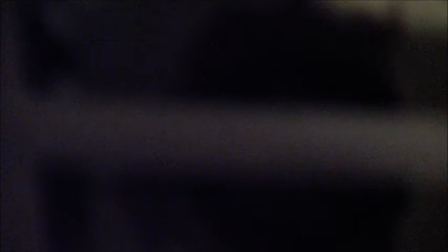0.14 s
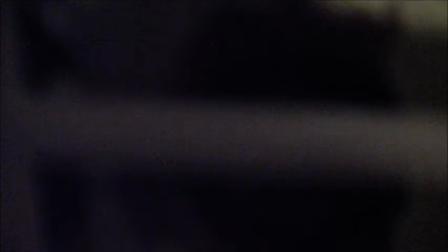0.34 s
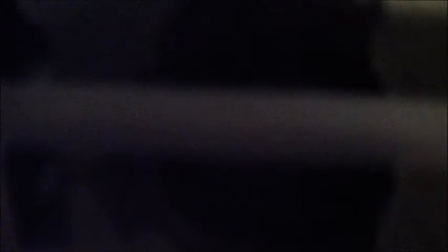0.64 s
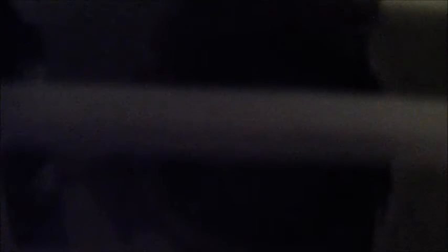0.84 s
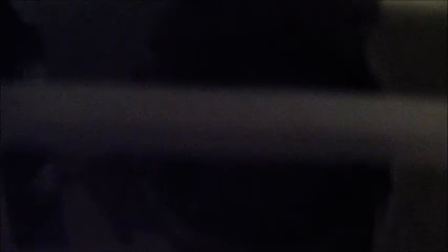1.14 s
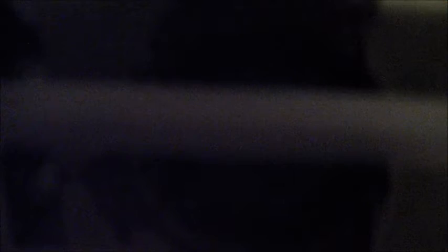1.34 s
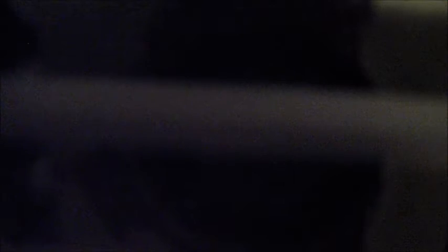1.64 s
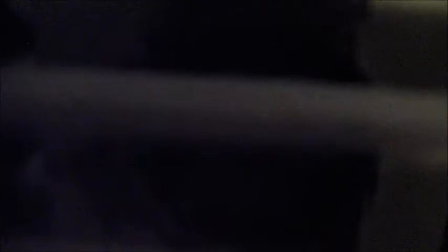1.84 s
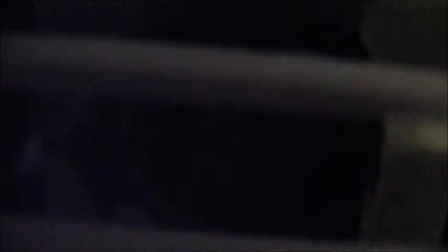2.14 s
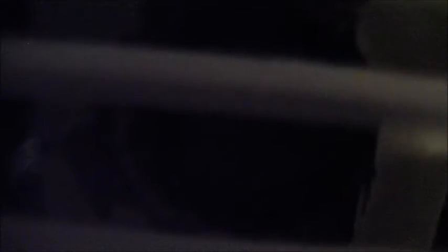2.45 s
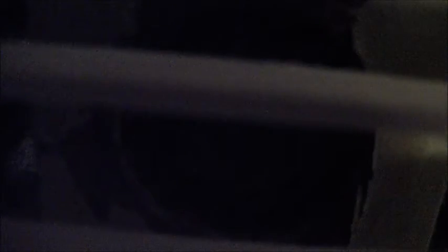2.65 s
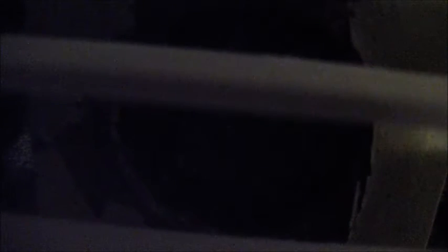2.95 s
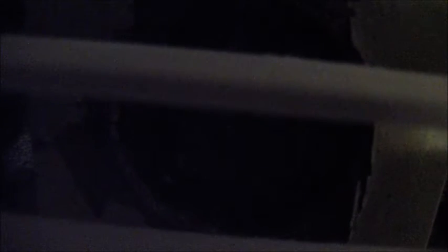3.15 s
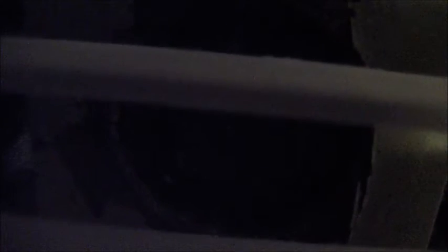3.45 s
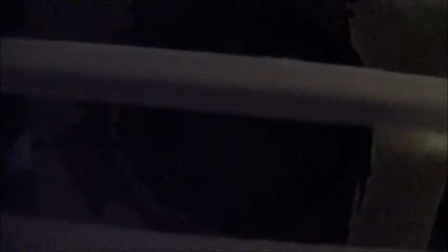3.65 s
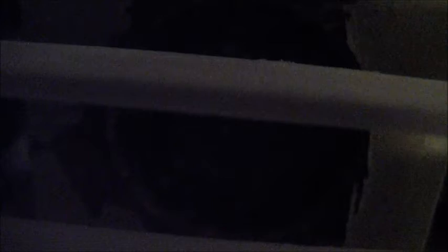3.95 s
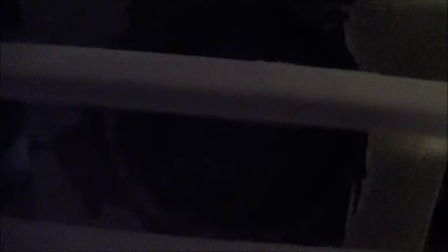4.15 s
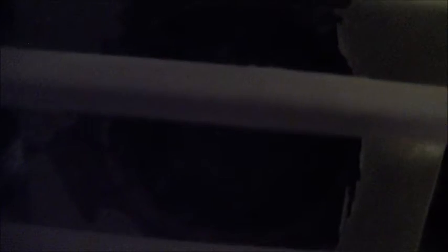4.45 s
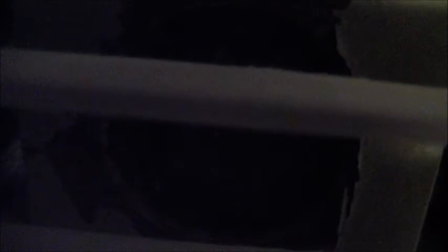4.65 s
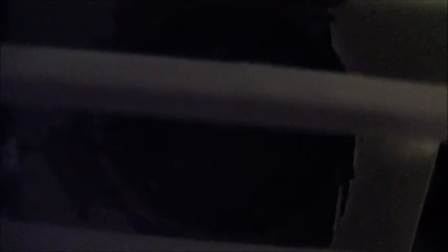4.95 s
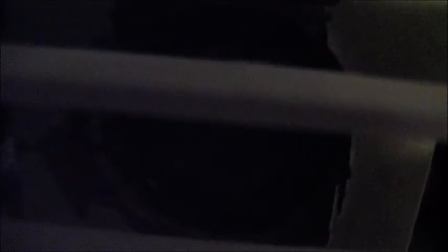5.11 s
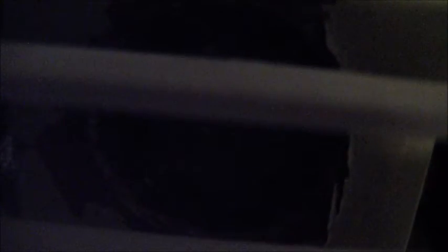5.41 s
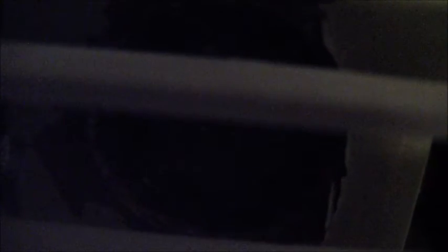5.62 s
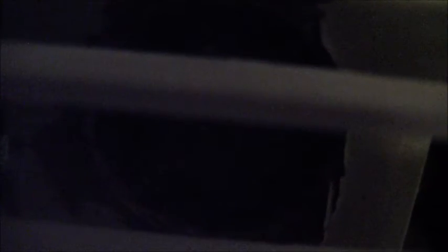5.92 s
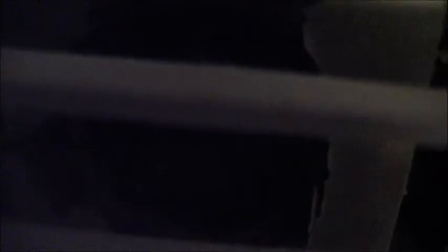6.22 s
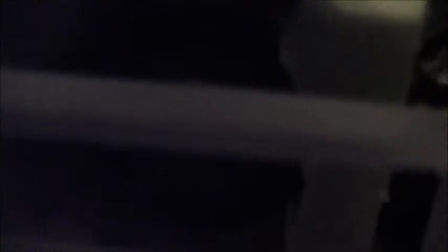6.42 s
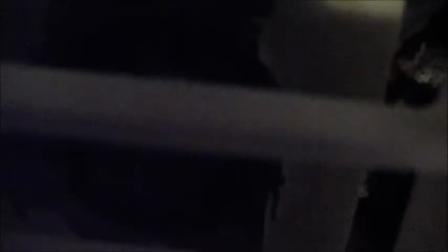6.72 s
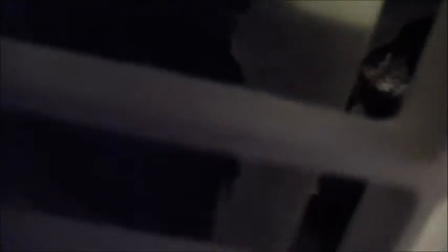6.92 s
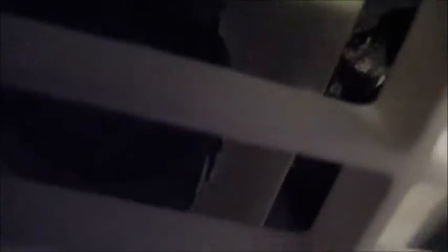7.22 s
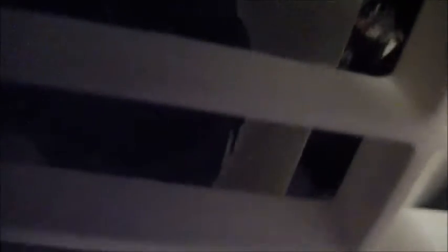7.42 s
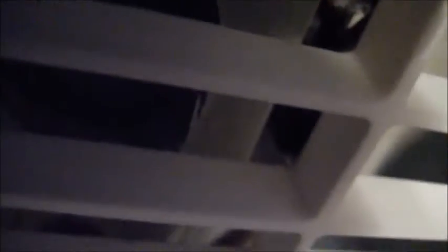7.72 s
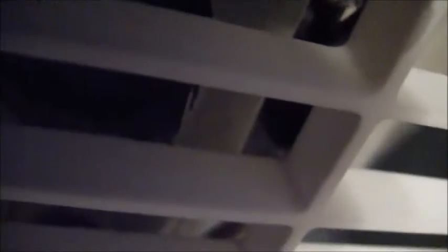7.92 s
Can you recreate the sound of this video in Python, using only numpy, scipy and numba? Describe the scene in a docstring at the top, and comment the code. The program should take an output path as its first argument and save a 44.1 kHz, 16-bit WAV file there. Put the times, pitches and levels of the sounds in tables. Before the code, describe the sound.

A small electric fan speeds up right at the microphone, humming and rushing, with a sharp plastic switch snap early on and fast light ticking.

```python
"""A small mains fan speeds up right in front of a two-port microphone for 8 s. From the start: summed motor hum
and blade tone, shaped noise for air rush and for draught on the ports, and short noise bursts for shaft ticks.
At 0.44 s a faint hiss swells, then a speed switch snaps (noise bursts, decaying sines, a jolt); the gain control
ducks under it. Then the pitch climbs on ever more slowly, the rush dips and surges, and the shaft ticks weaken,
mostly late. Stray ticks and fuller snaps, also noise bursts, are scattered throughout."""
import sys
import numpy as np
from scipy import signal
from scipy.fft import rfft, irfft, next_fast_len
from scipy.io import wavfile
from scipy.ndimage import uniform_filter1d, map_coordinates
from numba import njit

SR = 44100
rng = np.random.default_rng(int(sys.argv[2]) if len(sys.argv) > 2 else 0)


def master(y):
    """Save y as 16-bit WAV."""
    cut = np.clip(np.atleast_2d(y).T, -1, 1)
    pcm = np.round(cut * 32767)  # scale
    wavfile.write(sys.argv[1], SR, pcm.astype(np.int16))


N = 355842

# Draught on the ports: time_s, level_db
DRAUGHT_LEVEL = [(0, -38), (1.2, -22.5), (6, -21), (6.8, -23), (8.07, -30.5)]
# Draught spectrum: freq_hz, relative_db_per_hz
DRAUGHT_SPECTRUM = [(8.8, -15), (15, -1.5), (43, 5.5), (119, 0.5), (245, -10), (900, -45), (1170, -73),
                    (1980, -120)]

# Motor hum before the nearness gain: freq_hz, rms_db
HUM_PARTIALS = [(120, -39), (240, -44), (360, -50), (480, -51.5), (600, -47)]
# Hum gain as the ports near the motor: time_s, gain_db
HUM_NEARNESS = [(0, 3.5), (6.8, -2), (7.1, 0.5), (8.07, 4.5)]

# Shaft speed: time_s, speed_turns_per_s
SHAFT_SPEED = [(0, 12.216), (.6, 13.414), (1.5, 15.134), (2.5, 16.403), (3.5, 17.251), (4.5, 17.889),
               (5.5, 18.226), (6.5, 18.451), (8.07, 18.664)]
# Ticks out of step with the shaft, before the band filter: start_s, level_db
STRAY_TICKS = [(.0726, -17), (.851, -27), (.9937, -28), (1.5843, -19), (4.4214, -23), (5.1795, -16),
               (5.8394, -18), (6.273, -19), (7.0288, -21), (7.3479, -26), (7.8106, -23.5)]
# Fuller ticks and snaps, some on a shaft turn, before the band filter:
# start_s, level_db, t60_s, low_edge_hz, high_edge_hz
FULLER_SNAPS = [(.3605, -23, 0.0034, 3000, 20000), (.508, -20, .006, 1500, 5000),
                (2.262, -36, 0.28, 5500, 11000), (3.094, -26, .005, 3000, 12000),
                (7.6306, -6, 0.015, 1300, 2600), (8.03, -16, 0.02, 5000, 5000)]
TICK_PHASE_TURNS, TICK_JITTER_S = .485, .0015
TICK_DB, TICK_FADE_DB, TICK_SCATTER_DB = -22.5, 13, 2  # at the first speed; loss at full speed; spread

# Ring of the switch plastic before SWITCH_GAIN_DB: freq_hz, level_db, t60_s, left_lead_rad
PLASTIC_MODES = [(420, -11, 0.03, .3), (1005, -10, 0.018, .3), (1180, -14, .014, .3), (1400, -14, .01, .5),
                 (2120, 1, 0.006, .8), (3050, -9, .006, 1.6), (3570, -2, .006, 2.8), (4200, -5, 0.006, 1.2),
                 (4600, -7, .005, 2.6), (5350, -4, 0.007, .7), (6450, 1, 0.005, .1), (7700, -6, .004, .2),
                 (8500, -1, 0.004, .3), (10300, -5, .003, .8), (14000, -5, .003, .8)]
SWITCH_S, SWITCH_GAIN_DB = .4443, -3.5
HISS_RISE_S, HISS_RISE_DB = 0.032, -30  # level before SWITCH_GAIN_DB
JOLT_DB, JOLT_DECAY_S, JOLT_RIGHT_SHARE = -4, .014, -.6  # level before onset and SWITCH_GAIN_DB

# Blade tone before the eddy wobble: time_s, fundamental_db, octave_db
BLADE_TONE = [(0, -26, -35), (2, -25.5, -35.5), (4, -24.5, -39), (6, -27, -37), (6.8, -32.5, -39),
              (7.1, -25, -32.5), (8.07, -24, -32.5)]
BLADE_COUNT = 7

# Air rush before dips, surges and flutter: time_s, level_db
AIR_LEVEL = [(0, -40), (.4, -37.5), (.6, -37), (.9, -36.5), (1.5, -33.5), (2.3, -37), (3.3, -33),
             (4.3, -38), (5.2, -36.5), (6, -35.5), (6.6, -34.5), (7.2, -32), (8.07, -34)]
# The rush sinks briefly: start_s, depth_db
AIR_DIPS = [(1.01, 3), (1.15, 5), (1.23, 3), (1.59, 6.5), (1.65, 2), (1.84, 4), (2.1, 2.5), (2.42, 4),
            (2.52, 4), (2.73, 4), (2.88, 4), (2.94, 4), (3.079, 7.5), (3.33, 2.5), (3.59, 5.5), (3.75, 4.5),
            (3.9, 3.5), (4.09, 3.5), (4.16, 4), (4.22, 1.5), (4.41, 3), (5.2, 4.5), (5.43, 3.5),
            (6.07, 5.5), (6.33, 4.5), (6.61, 4), (6.702, 4), (6.801, 9.5), (6.84, 0), (7.22, 4),
            (7.41, 3.5), (7.7, 4)]
DIP_FALL_S, DIP_RECOVER_S = 0.027, 0.072
# The rush swells briefly: centre_s, rise_db, sigma_s
AIR_SURGES = [(.99, 2.5, .018), (1.1, 2.5, 0.029), (1.47, 1, 0.012), (2.05, 2, 0.016), (2.4, 3, 0.012),
              (3.03, 5, 0.03), (3.28, 1.5, 0.014), (3.58, 1, 0.016), (3.74, 3, 0.018), (4.07, 2, 0.015),
              (4.32, 4.5, 0.012), (4.39, 1, 0.013), (4.72, 3, 0.01), (5.1, 3.5, 0.017), (5.42, 2.5, 0.018),
              (5.538, 1.5, 0.0034), (5.74, 3, 0.012), (6.2, 2.5, 0.019), (6.47, 3, .015), (6.68, 5, 0.019),
              (7.15, 2, 0.02), (7.385, 3, 0.022), (7.99, 3.5, 0.013)]
# Over the air, as the ports drift along the grille, before flutter: time_s, low_air_db, fizz_db, hub_hiss_db
AIR_BALANCE = [(0, 14.5, -17.5, -19.5), (2, 11.5, -15.5, -22.5), (6.8, 11.5, -14.5, -24),
               (7.1, 11, -14, -23), (8.07, 12, -13.5, -21)]
# Low roar spectrum: freq_hz, relative_db_per_hz
LOW_SPECTRUM = [(35, -41), (60, -10.5), (121, 0), (156, -10), (243, -11.5), (404, -17), (486, -15.5),
                (800, -37.5), (1040, -58), (1760, -120)]
# Main air spectrum: freq_hz, relative_db_per_hz
BODY_SPECTRUM = [(320, -18.5), (550, -2.5), (799, -8.5), (1020, -4.5), (1480, -6), (1670, -13.5),
                 (1850, -15), (2580, -12.5), (2850, -11.5), (4000, -38.5), (5200, -72), (8800, -120)]
# Fizz spectrum: freq_hz, relative_db_per_hz
FIZZ_SPECTRUM = [(2060, -13.5), (3500, 0.5), (4470, -5), (5490, -6), (10500, -16), (13600, -39),
                 (22000, -120)]
# Hub hiss spectrum: freq_hz, relative_db_per_hz
HUB_SPECTRUM = [(5880, -9), (10000, -7), (10600, -10), (12000, -2), (13000, -5), (14300, -2.5), (15400, -7),
                (15900, -16), (16300, -22)]
# Left-right likeness of the air: freq_hz, correlation
AIR_LIKENESS = [(200, .95), (450, .96), (740, .982), (1220, .992), (1600, .98), (2010, .9), (3330, .87),
                (4800, .88), (6000, .7), (9080, .35), (15000, -.03)]

# Fan balance between the ports: freq_hz, left_over_right_db
FAN_LEAN = [(60, 5), (180, 1.5), (550, 1), (1650, 0), (4970, 0.5), (15000, 0)]
# Microphone cavities: centre_hz, width_hz, gain_db
PORT_CAVITIES = [(1663, 43, -6.5), (1847, 67, 7.5), (2597, 290, -6.5), (2820, 180, 0.5), (5370, 230, 2.5),
                 (5940, 220, 0.5), (6940, 1150, 0.5), (8100, 700, 1.5), (11700, 480, 1), (14000, 980, -2)]
DUCK_THRESHOLD_DB, DUCK_SLOPE = -7, .72  # slope: dB of ducking per dB of excess
DUCK_HOLD_S, DUCK_RELEASE_DB_PER_S, DUCK_ATTACK_S = .048, 200, .0068
CLIP_CEILING, TOP_HZ = .51, 15900  # full scale = 1


def amp(db):
    """Gain of a level."""
    return 10 ** (np.asarray(db) / 20)


def unit(x):
    """Scaled to rms 1."""
    return x / np.sqrt(np.mean(x ** 2) + 1e-20)


def along(points, hz):
    """(freq_hz, value) points interpolated on a log axis."""
    point_hz, value = np.transpose(points)
    return np.interp(np.log(hz + 1), np.log(point_hz + 1), value)


def curves(rows):
    """One value per sample for each column after the time."""
    time_s, *columns = np.transpose(rows)
    return [np.interp(np.arange(N) / SR, time_s, column) for column in columns]


def wobble(rate_hz):
    """Smooth random curve, rate_hz knots a second."""
    knots = rng.standard_normal(int(N * rate_hz / SR) + 4)
    return map_coordinates(knots, [np.arange(N) * rate_hz / SR])


def filtered(x, response):
    """x through a complex response of frequency."""
    size = next_fast_len(N + SR // 2)
    return irfft(rfft(x, size) * response(np.fft.rfftfreq(size, 1 / SR)), size)[..., :N]


def rush(spectrum, likeness, patchy_db):
    """Stereo noise of rms 1 with patches of random gain in time and frequency."""
    bins = signal.stft(rng.standard_normal((2, N)), nperseg=512)[2]
    patches = uniform_filter1d(rng.standard_normal(bins.shape[1:]), size=6, axis=0)
    patches = uniform_filter1d(patches, size=8, axis=1)
    pair = signal.istft(bins * amp(patchy_db * unit(patches)), nperseg=512)[1][:, :N]

    def mid_side(hz):
        angle = np.arccos(np.clip(along(likeness, hz), -1, 1)) / 2  # sets the port correlation
        return amp(along(spectrum, hz)) * [np.cos(angle), np.sin(angle)]

    mid, side = filtered(pair, mid_side)
    return unit(np.array([mid + side, mid - side]))


def snaps(rows, lo_hz, hi_hz, apart):
    """Dying noise bursts (start_s, level_db, t60_s) in a band; apart weights each port's own noise."""
    t = np.arange(SR // 10) / SR
    out = np.zeros((2, N + len(t)))
    for start_s, db, t60_s in rows:
        common = np.sign(rng.standard_normal(len(t)))
        own = rng.standard_normal((2, len(t)))
        envelope = amp(db - 60 * t / t60_s) * (1 - np.exp(-t / 0.00031))
        out[:, round(start_s * SR):][:, :len(t)] += envelope * (common + apart * own)

    def band(hz):
        highpass = (1j * hz / lo_hz / (1 + 1j * hz / lo_hz)) ** 4
        return highpass / (1 + 1j * hz / hi_hz) ** 2

    return filtered(out, band)


def shaft_turns():
    """Turns made so far: the running sum of shaft speed."""
    return np.cumsum(curves(SHAFT_SPEED)[0]) / SR


def flow_db():
    """Level of the air rush: dips sink quickly and recover slowly, surges come and go evenly."""
    t = np.arange(N) / SR
    level_db = curves(AIR_LEVEL)[0]
    for centre_s, rise_db, sigma_s in AIR_SURGES:
        level_db = level_db + rise_db * np.exp(-.5 * ((t - centre_s) / sigma_s) ** 2)
    for start_s, depth_db in AIR_DIPS:
        fall = np.clip((t - start_s) / DIP_FALL_S, 0, 1)
        recovery = np.exp(-np.clip(t - start_s - DIP_FALL_S, 0, None) / DIP_RECOVER_S)
        level_db = level_db - depth_db * fall * recovery
    return level_db


def draught():
    """Eddies buffet each port almost on their own, in lumps that swell where the air rush dips."""
    level_db, = curves(DRAUGHT_LEVEL)
    air_db = flow_db()
    lumps_db = 1.8 * np.array([wobble(14), wobble(12)]) - 0.24 * (air_db - air_db.mean())
    noise = rush(DRAUGHT_SPECTRUM, [(30, 0.078)], patchy_db=0.16)
    return amp(level_db) * unit(amp(lumps_db) * noise)


def fuller_snaps():
    """Fuller ticks and snaps, some on a shaft turn: one filtered noise burst each."""
    return sum(snaps([(start_s, db, t60_s)], lo_hz=lo_hz, hi_hz=hi_hz, apart=0.67)
               for start_s, db, t60_s, lo_hz, hi_hz in FULLER_SNAPS)


def ticks():
    """Something on the shaft brushes the frame once a turn, more lightly with speed; strays fall between."""
    turns, (speed,) = shaft_turns(), curves(SHAFT_SPEED)
    at = np.searchsorted(turns, np.arange(TICK_PHASE_TURNS, turns[-1] - 1))
    late, size = rng.standard_normal((len(at), 2)).T
    speed_up = (speed[at] - speed[0]) / np.ptp(speed)  # 0 to 1
    level_db = TICK_DB - TICK_FADE_DB * speed_up ** 6 + TICK_SCATTER_DB * size
    rows = [*zip(at / SR + TICK_JITTER_S * late, level_db), *STRAY_TICKS]
    return snaps([(s, db, .007) for s, db in rows], lo_hz=12000, hi_hz=16000, apart=0.66)


def switch():
    """A faint hiss swells just before the switch snaps: crack, rattle, rebound, plastic modes, a jolt."""
    t = np.arange(N) / SR - SWITCH_S
    after = np.clip(t, 0, .1)
    half = np.array([[.5], [-.5]])
    ring = sum(amp(db - 60 * after / t60_s) * np.sin(2 * np.pi * hz * after + lead_rad * half)
               for hz, db, t60_s, lead_rad in PLASTIC_MODES)
    push = np.exp(-after / JOLT_DECAY_S) * (1 - np.exp(-after / .002))
    jolt = -amp(JOLT_DB) * push * np.array([[1], [JOLT_RIGHT_SHARE]])
    hiss_rise = np.clip(1 + t / HISS_RISE_S, 0, 1) ** 1.5 * (t < 0)
    hiss_spectrum = [(1500, -26), (3500, 2), (9000, -6), (15000, -10)]  # freq_hz, relative_db_per_hz
    hiss = amp(HISS_RISE_DB) * hiss_rise * rush(hiss_spectrum, [(3000, .3)], patchy_db=6.0)
    bursts = [(SWITCH_S - .0012, -14, .004),  # lead-in tick
              (SWITCH_S, 4, .003),  # crack
              (SWITCH_S, -18, .035),  # rattle
              (SWITCH_S + 0.016, -31, .03)]  # rebound
    crack = snaps(bursts, lo_hz=890, hi_hz=9000, apart=1.0)
    return amp(SWITCH_GAIN_DB) * (hiss + (ring + jolt) * (t > 0) + crack)


def motor():
    """The windings hum at even multiples of the mains."""
    t, (near_db,) = np.arange(N) / SR, curves(HUM_NEARNESS)
    hum = 0
    for hz, db in HUM_PARTIALS:
        level = np.sqrt(2) * amp(db + near_db + 0.55 * wobble(11))
        hum = hum + level * np.sin(2 * np.pi * hz * t + 0.1 * wobble(5))
    return hum


def blades():
    """Each blade passing the grille is one peaked push of air; inflow eddies shake size and phase."""
    tone_db, octave_db = curves(BLADE_TONE)
    phase = 2 * np.pi * BLADE_COUNT * shaft_turns() + 0.34 * wobble(30)
    orders = [(1, tone_db), (2, octave_db), (3, octave_db - 6.0), (4, octave_db - 10)]
    return sum(np.sqrt(2) * amp(db + 2.4 * wobble(30)) * np.cos(k * phase) for k, db in orders)


def air():
    """Turbulence off blades, grille and hub; the bands flutter together, low roar and hub hiss less so."""
    low_db, fizz_db, hub_db = curves(AIR_BALANCE)
    air_db = flow_db() + 0.2 * wobble(12) + 0.26 * wobble(30) + 1.41 * wobble(70)
    swing_db = air_db - air_db.mean()
    low_db = low_db - 0.082 * swing_db + 1.2 * wobble(18)
    low = amp(low_db) * rush(LOW_SPECTRUM, AIR_LIKENESS, patchy_db=1.0)
    body = amp(1.5) * rush(BODY_SPECTRUM, AIR_LIKENESS, patchy_db=0.86)
    fizz = amp(fizz_db) * rush(FIZZ_SPECTRUM, AIR_LIKENESS, patchy_db=1.06)
    hub = amp(hub_db - 0.3 * swing_db) * rush(HUB_SPECTRUM, AIR_LIKENESS, patchy_db=2.5)
    return amp(air_db) * (low + body + fizz + hub)


def scene():
    """The fan sits slightly to one side of the ports."""
    fan = motor() + blades() + air()
    sides = filtered(fan, lambda hz: amp(along(FAN_LEAN, hz) * [[.5], [-.5]]))
    return draught() + fuller_snaps() + ticks() + switch() + sides


@njit
def duck(excess_db, hold, release, attack):
    """Gain in dB: heads for the last excess, waits, then its goal climbs back at a fixed speed."""
    gain, goal, wait, now = np.zeros(len(excess_db)), 0., 0., 0.
    for i in range(len(excess_db)):
        wait -= 1
        if -excess_db[i] <= goal:
            goal, wait = -excess_db[i], hold
        elif wait < 0:
            goal = min(goal + release, 0.)
        now += attack * (goal - now)
        gain[i] = now
    return gain


def cavity(hz, centre_hz, width_hz, gain_db):
    """Response of one resonant port cavity: a peak or notch at its centre."""
    stiffness = centre_hz * centre_hz - hz * hz
    damping = 1j * hz * width_hz
    return (stiffness + damping * amp(gain_db / 2)) / (stiffness + damping / amp(gain_db / 2))


def record(dry):
    """Port cavities colour the sound; a gain control follows the peaks, what outruns it is soft-clipped."""
    x = filtered(dry, lambda hz: np.prod([cavity(hz + 1e-3, *row) for row in PORT_CAVITIES], axis=0))
    excess_db = 20 * np.log10(np.abs(x).max(axis=0) + 1e-9) - DUCK_THRESHOLD_DB
    gain_db = duck(DUCK_SLOPE * excess_db, DUCK_HOLD_S * SR, DUCK_RELEASE_DB_PER_S / SR,
                   1 / (DUCK_ATTACK_S * SR))
    x = x * amp(gain_db)
    x = x / (1 + np.abs(x / CLIP_CEILING) ** 6) ** (1 / 6)
    return filtered(x, lambda hz: 1 / (1 + (hz / TOP_HZ) ** 400))  # steep treble cutoff


dry = scene()
out = record(dry)
master(out)
```